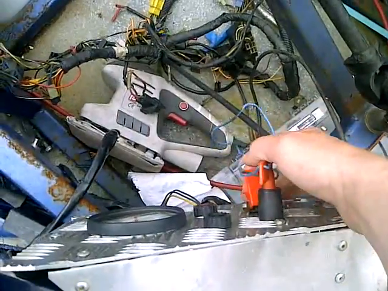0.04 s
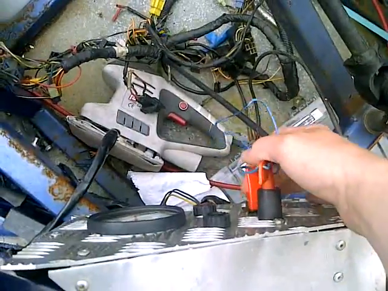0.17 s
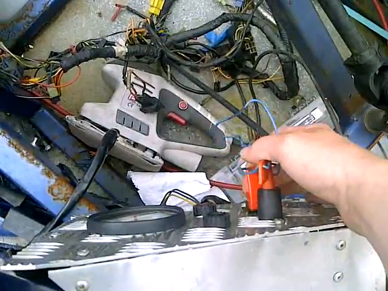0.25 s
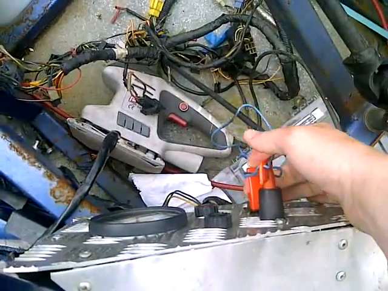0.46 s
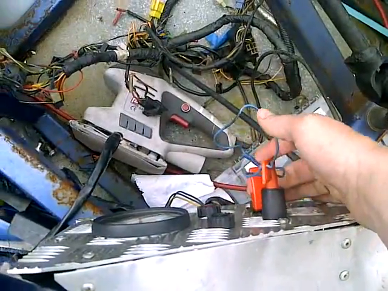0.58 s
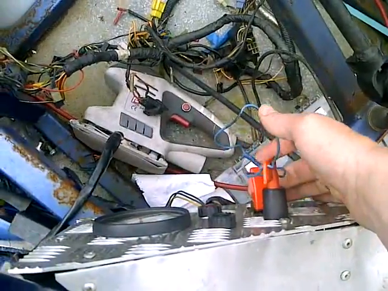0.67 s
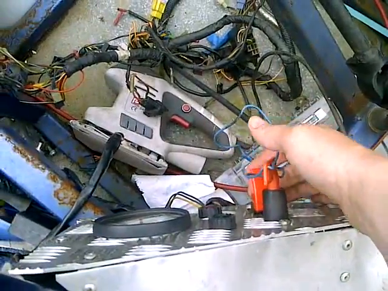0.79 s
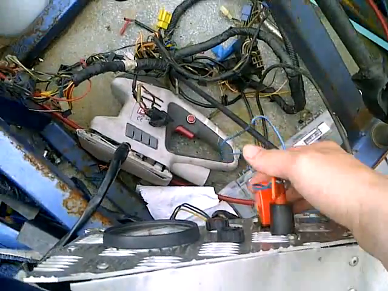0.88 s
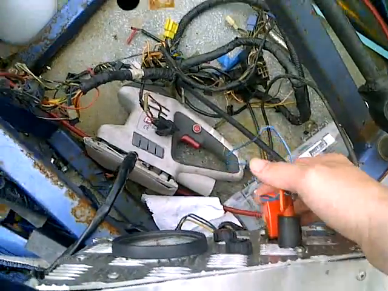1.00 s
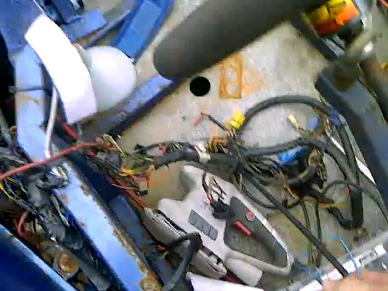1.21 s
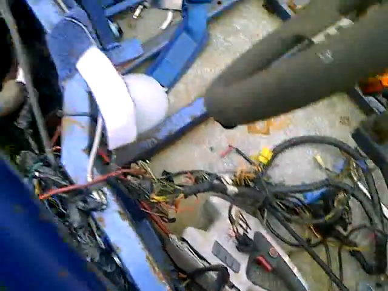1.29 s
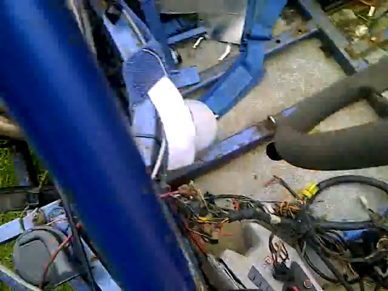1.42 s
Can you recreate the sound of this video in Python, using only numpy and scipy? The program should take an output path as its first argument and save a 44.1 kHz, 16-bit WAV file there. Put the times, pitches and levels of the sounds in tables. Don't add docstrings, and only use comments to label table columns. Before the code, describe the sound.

A stiff switch clacks sharply twice on a metal panel, over faint distant traffic and hiss

```python
import sys
import numpy as np
from scipy import signal
from scipy.fft import rfft, irfft
from scipy.io import wavfile
from scipy.ndimage import uniform_filter1d

SR = 44100
rng = np.random.default_rng(int(sys.argv[2]) if len(sys.argv) > 2 else 0)


def wav_out(sig):
    wavfile.write(sys.argv[1], SR, np.round(np.clip(np.atleast_2d(sig).T, -1, 1) * 32767).astype(np.int16))


def how_loud(loudness_db):
    steps = np.asarray(loudness_db, float) / 20
    return 10 ** steps


N = 63945

# pitch_hz, density_db (per Hz)
TRAFFIC_SPECTRUM = [(28, -26), (65, -8.5), (130, -10), (420, -4), (1150, -6), (1700, -11), (2200, -22),
                    (3000, -29)]
# pitch_hz, density_db (per Hz)
HISS_SPECTRUM = [(300, -15.5), (2000, -1.5), (3000, -7.5), (4500, -3), (6800, -4), (7700, -4.5),
                 (8600, -1.5), (9200, -54.5)]
TRAFFIC_DB, HISS_DB = -53.5, -66
SWELL_DB, FLICKER_DB = .25, .4

# start_s, level_db, pitch_hz
WIND_PUFFS = [
    (.011, -40.5, 149),
    (0.047, -44.5, 200),
    (.058, -41, 172),
    (0.067, -39, 213),
    (0.083, -49, 127),
    (0.107, -51, 117),
    (.139, -40, 124),
    (0.168, -43, 147),
    (0.174, -71, 100),
    (0.183, -46, 148),
]
PUFF_CYCLES = 1.2
GUST_DB, GUST_HZ, GUST_ENDS_S = -62, 93, .19

# start_s, housing_level_db, panel_level_db, rattle_s
THROW_CONTACTS = [
    (.2303, -31, -56, 0.0016),
    (.2325, -27, -73.5, 0.0022),
    (.2362, -22, -39.5, 0.0019),
    (.2390, -24.5, -26, 0.0019),
    (.2440, -30, -45, 0.0056),
    (.2525, -47, -53, 0.0037),
    (.2640, -46, -56, 0.0042),
    (.2735, -55.5, -55.5, 0.024),
]
# start_s, housing_level_db, panel_level_db, rattle_s
RETURN_CONTACTS = [
    (.6456, -34.5, -54, 0.0011),
    (.6466, -27, -46, .002),
    (.6495, -33, -48, 0.0035),
    (.6530, -35, -40, 0.0042),
    (.6570, -47.5, -53, 0.0039),
    (.6645, -44.5, -71, 0.0036),
]
# pitch_hz, level_db, t60_s
THROW_PANEL_MODES = [(273.7, -20, .2), (399, -6.5, 0.14), (430, -6.5, 0.076), (534.4, 0.5, 0.12),
                     (594, -11, 0.044), (593, -2.5, 0.13), (669, 1, 0.037), (730, -22.5, 0.015),
                     (860, -0.5, 0.019), (952.5, -11.5, 0.28), (912, 3, 0.082), (1191, 0.5, .05),
                     (1270, 3, 0.027), (1304, -16, 0.036)]
# pitch_hz, level_db, t60_s
THROW_HOUSING_MODES = [(1660, -31, 0.0084), (1648, 0.5, .03), (1940, -16, 0.02), (1970, -14, 0.017),
                       (2360, -3.5, 0.0067), (2687, -4.5, 0.013), (2993, -2, 0.021), (3137, -0.5, 0.007),
                       (4140, -7.5, .015), (4520, -3.5, 0.0087), (5210, -6, 0.013), (5480, -7, 0.014),
                       (6800, -10.5, 0.005), (7060, -11.5, 0.016)]
# pitch_hz, level_db, t60_s
RETURN_PANEL_MODES = [(438, -32.5, 0.046), (625, 7, 0.04), (880, -3, 0.025), (923, -0.5, 0.048),
                      (1070, -21, 0.01), (1345, -41, .04)]
# pitch_hz, level_db, t60_s
RETURN_HOUSING_MODES = [(1460, -1, 0.021), (1630, -1.5, 0.014), (2080, -2, 0.013), (2370, -5.5, 0.0056),
                        (2750, -15.5, .08), (2915, -6, 0.02), (3430, -7, 0.004), (3570, -10.5, 0.014),
                        (3980, -9, 0.015), (5012, -12.5, 0.007), (5250, -9.5, 0.005), (6363, -10.5, 0.0122),
                        (7170, -25, 0.0075), (7000, -5.5, 0.0086)]
THROW_CRACK_DB, RETURN_CRACK_DB = 12.5, 20.5
CRACK_HZ, CRACK_WIDTH_HZ = 3600, 15000
ECHO_DB, ECHO_T60_S, ECHO_HZ = -13, 0.14, 3000
BOOM_DB, BOOM_T60_S, BOOM_HZ = -16.5, 0.3, 580
PANEL_LOW_HZ = 260
CLICK_TOP_HZ = 8000

# start_s, level_db
SAG_HITS = [
    (.258, -42),
    (.662, -47),
]
# pitch_hz, level_db, t60_s
SAG_RING = [(200, -6, 0.087), (304, -3.5, 0.047), (345, 2, 0.2)]
# start_s, level_db
HAND_HITS = [
    (1.136, -45),
    (1.147, -45.5),
    (1.156, -46),
    (1.165, -59),
    (1.175, -49.5),
    (1.188, -58),
    (1.257, -50.5),
]
# pitch_hz, level_db, t60_s
HAND_RING = [(170, -11.5, 0.075), (249, -5, 0.17), (340, -5.5, 0.092), (480, -5, 0.078)]
TOP_HZ = 9300


def walk(rate_hz):
    k = int(SR / rate_hz)
    steps = np.repeat(rng.standard_normal(N // k + 1), k)
    w = uniform_filter1d(uniform_filter1d(steps, k), k)[:N]
    return (w - w.mean()) / w.std()


def colour(points):
    hz, db = np.transpose(points)
    f = np.fft.rfftfreq(N, 1 / SR) + 1
    return rfft(rng.standard_normal(N)) * how_loud(np.interp(np.log(f), np.log(hz), db))


def traffic_and_hiss():
    spectrum, swell, traffic = colour(TRAFFIC_SPECTRUM), walk(5.5), 0
    place = 3 * np.log2((np.fft.rfftfreq(N, 1 / SR) + 1) / 20)
    for k in range(29):
        part = irfft(spectrum * np.clip(1 - abs(place - k), 0, 1), N)
        traffic = traffic + how_loud(SWELL_DB * swell + FLICKER_DB * walk(9.7)) * part
    hiss = irfft(colour(HISS_SPECTRUM), N)
    return traffic * how_loud(TRAFFIC_DB) / traffic.std() + hiss * how_loud(HISS_DB) / hiss.std()


def band(x, hz, width_hz):
    return signal.lfilter(*signal.iirpeak(hz, hz / width_hz, fs=SR), x)


def wind():
    t, puffs = np.arange(N) / SR, 0
    for start_s, level_db, pitch_hz in WIND_PUFFS:
        u = np.clip((t - start_s) * pitch_hz / PUFF_CYCLES, 0, 1)
        puffs = puffs + how_loud(level_db) * np.sin(np.pi * u) ** 2 * np.cos(2 * np.pi * PUFF_CYCLES * u)
    gust = band(rng.standard_normal(N), GUST_HZ, GUST_HZ)
    fade = 1 / (1 + np.exp((t - GUST_ENDS_S) / 0.01))
    return puffs + how_loud(GUST_DB + 2.1 * walk(24.5)) * gust / gust.std() * fade


def ring(x, modes):
    out = 0
    for k, (hz, db, t60_s) in enumerate(modes):
        pole = np.exp(2j * np.pi * hz / SR - np.log(1000) / (t60_s * SR))
        out = out + (-1) ** k * how_loud(db) * signal.lfilter([1], [1, -pole], x).imag
    return out


def tub(x, level_db, t60_s, hz):
    t = np.arange(SR // 3) / SR
    tail = band(rng.standard_normal(len(t)), hz, 2.9 * hz) * how_loud(-60 * t / t60_s)
    tail = tail * (t > .003)
    return x + how_loud(level_db) * signal.fftconvolve(x, tail / np.sqrt(np.sum(tail ** 2)))[:N]


def switch(contacts, housing_modes, panel_modes, crack_db):
    t, tick, push = np.arange(N) / SR, np.zeros(N), np.zeros(N)
    for start_s, housing_db, panel_db, rattle_s in contacts:
        decay = np.exp(-np.clip(t - start_s, 0, 1) / rattle_s) * (t >= start_s)
        grit = rng.standard_normal(N) * decay
        tick += how_loud(housing_db) * grit / np.sqrt(np.sum(grit ** 2))
        push[int(start_s * SR)] += how_loud(panel_db)
    bright = ring(tick, housing_modes) + how_loud(crack_db) * band(tick, CRACK_HZ, CRACK_WIDTH_HZ)
    body = ring(uniform_filter1d(push, size=9), panel_modes)
    sound = tub(bright, ECHO_DB, ECHO_T60_S, ECHO_HZ) + tub(body, BOOM_DB, BOOM_T60_S, BOOM_HZ)
    return signal.sosfilt(signal.butter(2, PANEL_LOW_HZ, "high", fs=SR, output="sos"), sound)


def knock(hits, modes):
    push = np.zeros(N)
    for start_s, level_db in hits:
        push[int(start_s * SR)] = how_loud(level_db)
    return ring(uniform_filter1d(push, size=41), modes)


def scene():
    clicks = switch(THROW_CONTACTS, THROW_HOUSING_MODES, THROW_PANEL_MODES, THROW_CRACK_DB)
    clicks = clicks + switch(RETURN_CONTACTS, RETURN_HOUSING_MODES, RETURN_PANEL_MODES, RETURN_CRACK_DB)
    clicks = signal.sosfilt(signal.butter(3, CLICK_TOP_HZ, fs=SR, output="sos"), clicks)
    knocks = knock(SAG_HITS, SAG_RING) + knock(HAND_HITS, HAND_RING)
    return (clicks + knocks + wind() + traffic_and_hiss())[None]


def low_pass(x):
    return signal.sosfilt(signal.butter(12, 9030, fs=SR, output="sos"), x)


def record(dry):
    mix = signal.sosfilt(signal.cheby2(8, 50, TOP_HZ, fs=SR, output="sos"), dry)
    return low_pass(mix)


dry = scene()
out = record(dry)
wav_out(out)
```